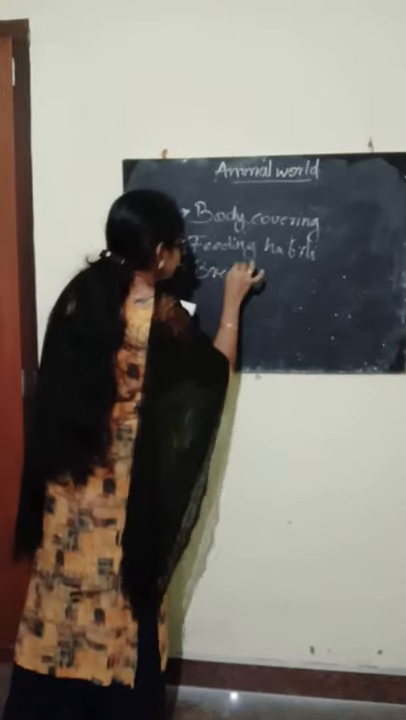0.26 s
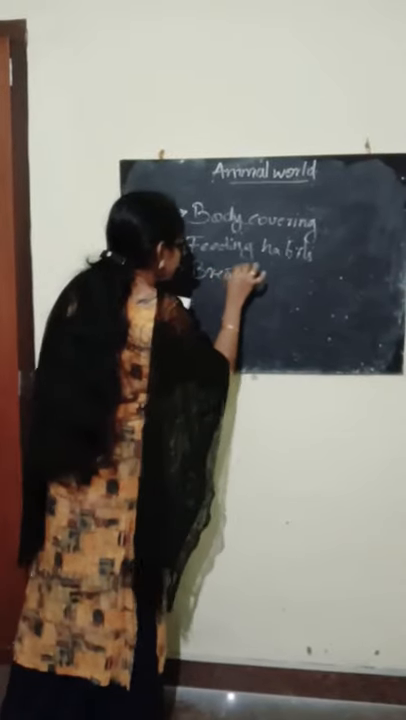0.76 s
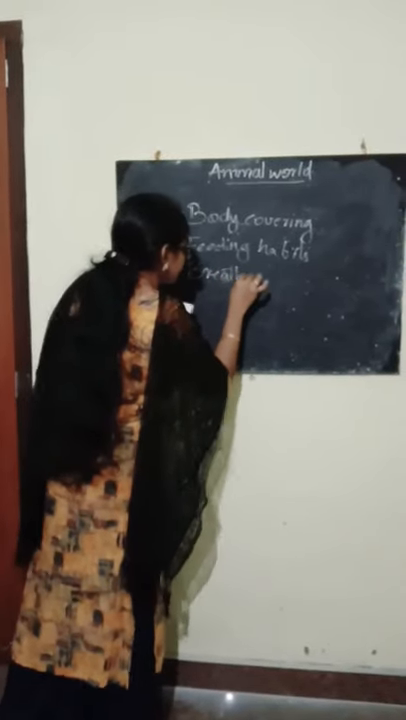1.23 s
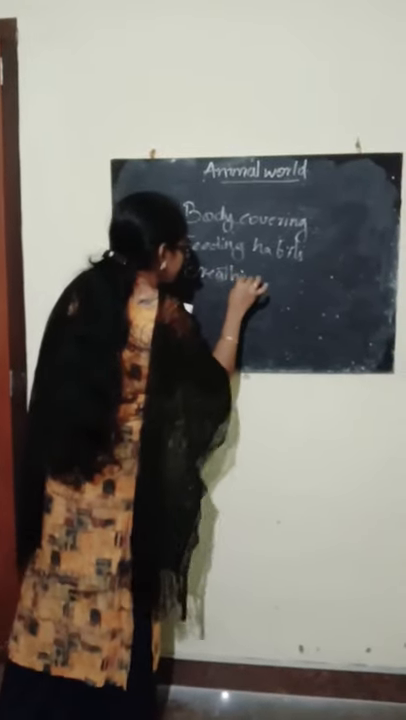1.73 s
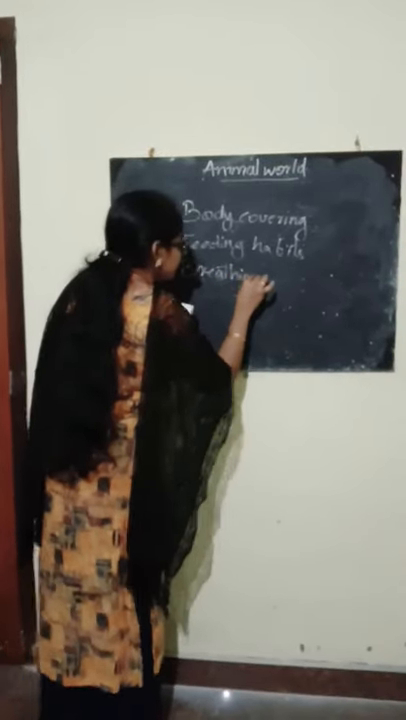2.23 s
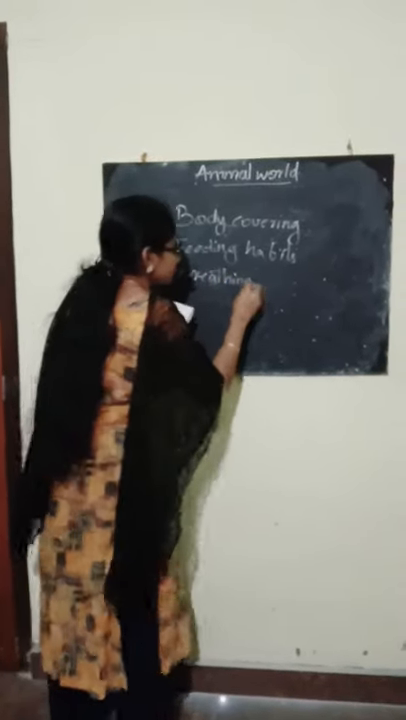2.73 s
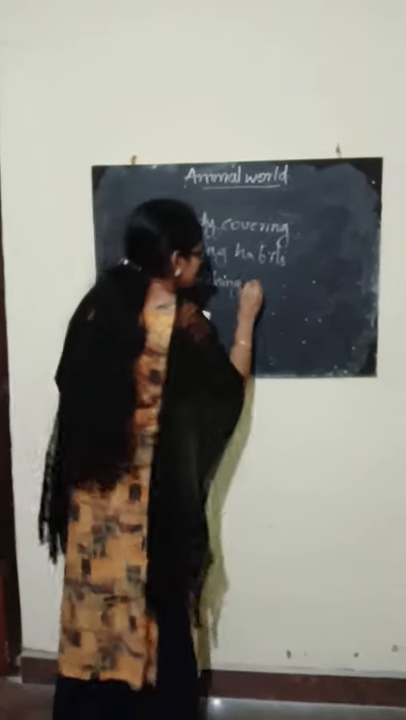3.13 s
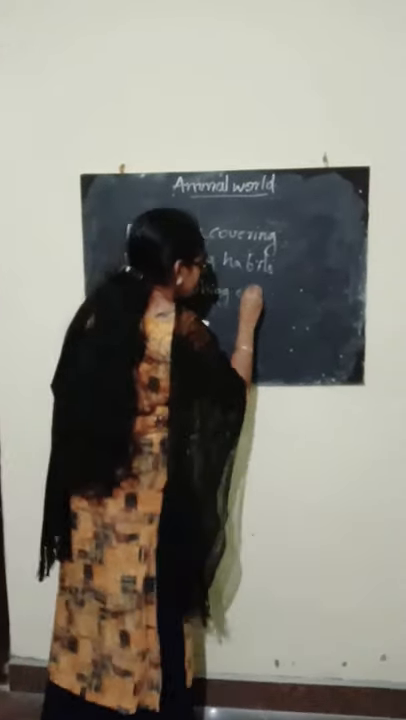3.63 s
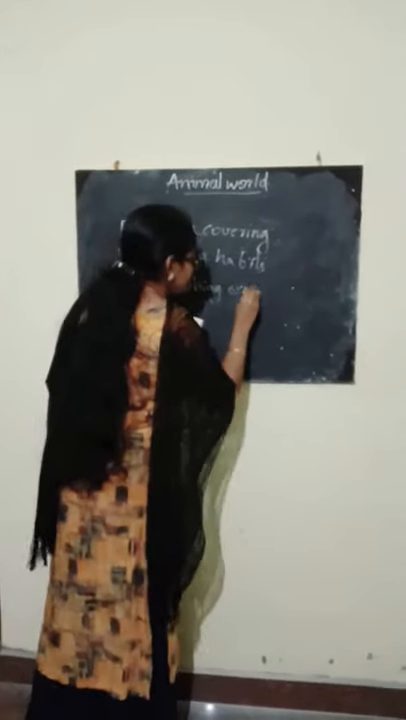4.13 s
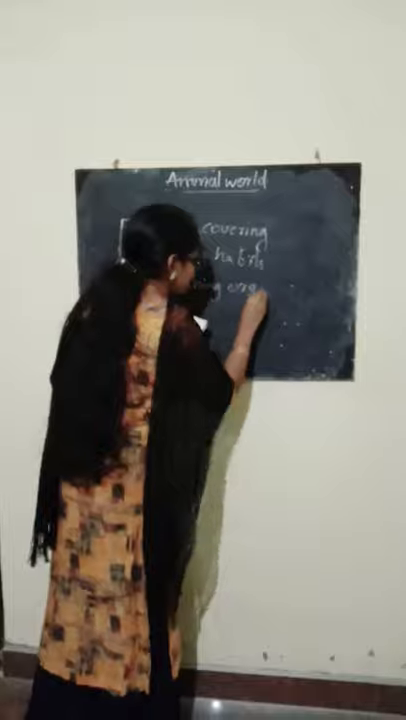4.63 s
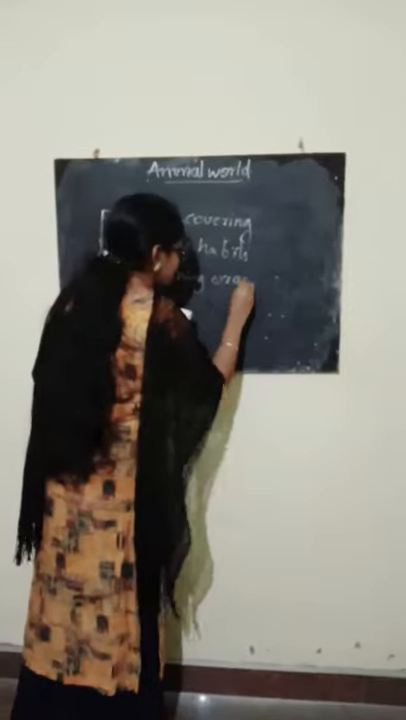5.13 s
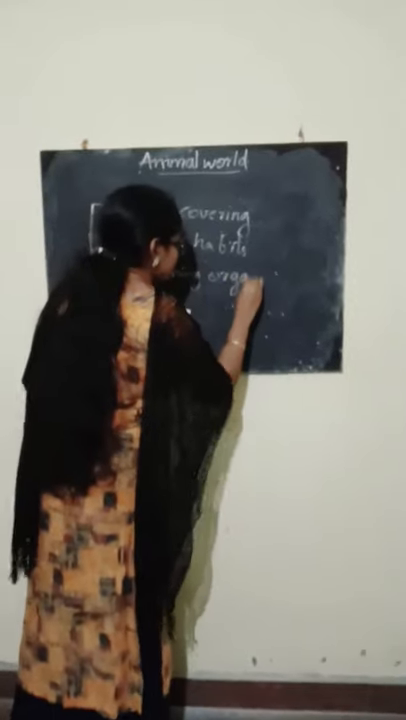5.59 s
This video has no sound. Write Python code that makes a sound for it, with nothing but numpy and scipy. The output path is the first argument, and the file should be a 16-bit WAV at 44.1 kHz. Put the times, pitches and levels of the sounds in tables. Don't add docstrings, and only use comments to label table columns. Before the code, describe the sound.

Chalk writes on a thin wall-mounted blackboard in a bare, echoing room, with quick scratchy strokes, sharp taps and short pauses.

```python
import sys
import numpy as np
from scipy import signal
from scipy.fft import rfft, irfft, next_fast_len
from scipy.io import wavfile
from scipy.ndimage import uniform_filter1d

SR = 44100
rng = np.random.default_rng(int(sys.argv[2]) if len(sys.argv) > 2 else 0)


def to_wav(sig):
    pcm = np.clip(np.atleast_2d(sig), -1, 1) * 32767
    pcm = np.round(pcm).astype(np.int16)
    wavfile.write(sys.argv[1], SR, pcm.T)


def ratio(d):
    e = np.asarray(d, float) / 20
    return 10 ** e


N = 258381

# mode_hz, level_db, t60_s
BOARD_MODES = [(245.5, 4.5, 0.89), (334, 3.5, 0.54), (396, -11.5, 0.1), (457, -4.5, 0.1), (520, -7.5, 0.17),
               (670, 2.5, 0.45), (710, -13.5, 0.54), (795, 1, 0.3)]
# mode_hz, level_db, t60_s
CHALK_MODES = [(1019, -3.5, 0.38), (1420, -6, 0.14), (1830, -16, 0.036), (1880, -36, 0.09),
               (2500, -9, 0.09), (2735, 17, 0.021)]
CONTROL_STEP = 64


def rms_one(x):
    return x / np.sqrt(np.mean(x ** 2) + 1e-20)


def at_hz(points, hz):
    known_hz, known_value = np.transpose(points)
    return np.interp(np.log(hz), np.log(known_hz), known_value)


def coloured(x, points):
    size = next_fast_len(x.shape[-1] + SR // 4) // 2 * 2
    hz = np.maximum(np.arange(size // 2 + 1) * SR / size, 1)
    cepstrum = irfft(at_hz(points, hz) * np.log(10) / 20, size)
    cepstrum[1:size // 2] *= 2
    cepstrum[size // 2 + 1:] = 0
    return irfft(rfft(x, size) * np.exp(rfft(cepstrum)), size)[..., :x.shape[-1]]


def band(x, low_hz, high_hz):
    sections = signal.butter(2, [low_hz, high_hz], "band", fs=SR, output="sos")
    return signal.sosfilt(sections, x + 1e-18)


def drift(rate_hz):
    r = np.exp(-2 * np.pi * rate_hz / SR)
    wander = signal.lfilter([1], [1, -2 * r, r * r], rng.standard_normal(N + SR))
    return rms_one(wander[SR:])


def ring(x, hz, t60_s):
    r, w = ratio(-60 / (t60_s * SR)), 2 * np.pi * hz / SR
    return signal.lfilter([0, np.sin(w)], [1, -2 * r * np.cos(w), r * r], x + 1e-18)


def resonate(x, hz, width_hz):
    r, w = np.exp(-np.pi * width_hz / SR), 2 * np.pi * hz / SR
    return signal.lfilter(np.array([1, 0, -1]) * (1 - r * r) / 2, [1, -2 * r * np.cos(w), r * r], x + 1e-18)


def taps():
    # start_s, peak_db, thud_db, crack_db, tick_db
    landings = [
        (0.317, -25.5, -18, -13.5, -17),
        (0.628, -34.5, -12.5, -13.5, -23),
        (1.285, -39.5, -14, -22.5, -40),
        (1.527, -33.5, -14, -17.5, -25.5),
        (1.708, -28.5, -17.5, -23, -40),
        (3.583, -28, -19.5, -22, -26),
        (4.024, -30.5, -17, -20.5, -28.5),
        (4.869, -45, -24.5, -33, -34),
    ]
    # part_hz, level_db
    blow = [
        (90, 23.5),
        (260, 21),
        (750, 15.5),
        (1250, -3.5),
        (2700, 10.5),
        (4800, 12.5),
        (7800, 16),
        (15000, 13.5),
    ]
    hz, db = np.transpose(blow)
    out = np.zeros(N + SR)
    responses = room(count=len(landings), tail_db=-11)
    for (start_s, peak_db, thud, crack, tick), spot in zip(landings, responses):
        knock, air = thud + 6, tick + 6.9
        shares = np.array([thud, thud, thud, 0, knock, crack, tick, air])
        heard = coloured(spot, np.transpose([hz, db + shares + peak_db]))
        modes = sum(ratio(mode_db + rng.normal(-1.2, 2.4)) * resonate(heard, mode_hz, 5.1 / t60_s)
                    for mode_hz, mode_db, t60_s in [*BOARD_MODES, *CHALK_MODES[:-1]])
        brief = heard * np.exp(-np.arange(len(spot)) / SR / 0.0098)
        stick = ratio(4.5) * resonate(brief, 2750, width_hz=260)
        at = round(start_s * SR)
        out[at:at + len(spot)] += heard + modes + stick
    return out[:N]


def strokes():
    hiss_db, grit_db = dusting()
    hum_db, centre_hz, scratch_db = pressing()
    grains = crumbling()
    dust = dust_hiss(grains, hiss_db) + grit(grains, hiss_db + grit_db)
    dust = dust + whistles(grains, hiss_db + 0.62 * grit_db)
    rub = scratching(grains, scratch_db) + board_hum(grains, hum_db, centre_hz)
    return dust + rub + squeaks(grains) + knuckles(hum_db)


def dusting():
    # middle_s, length_s, hiss_db, grit_db
    chalk_strokes = [(-0.002, 0.092, -62, -57), (0.146, 0.12, -63.5, -83), (0.45, 0.16, -71, -46),
                     (0.736, 0.11, -59, -51), (0.928, 0.12, -59, -78), (1.058, 0.092, -61.5, -59),
                     (1.158, 0.13, -63, -78), (1.4, 0.12, -62, -73), (1.743, 0.11, -62, -62),
                     (1.912, 0.12, -67, -76), (2.013, 0.086, -62, -75), (2.113, 0.11, -64.5, -60),
                     (2.242, 0.11, -66.5, -56), (2.317, 0.16, -60.5, -60), (2.479, 0.15, -57.5, -57),
                     (2.614, 0.17, -56, -48.5), (2.756, 0.052, -68, -84),
                     (3.19, 0.096, -66, -65), (3.27, 0.15, -62.5, -59.5), (3.36, 0.1, -60.5, -56),
                     (3.462, 0.12, -63, -61), (3.74, .11, -64, -62), (3.89, 0.11, -63.5, -56.5),
                     (4.181, 0.15, -64.5, -65), (4.281, 0.13, -69.5, -71), (4.35, 0.038, -68, -61),
                     (4.5, 0.16, -58, -63), (4.658, 0.14, -56.5, -54.5), (4.81, 0.13, -71, -68),
                     (5.12, 0.25, -69, -73), (5.268, 0.19, -66.5, -62), (5.4, 0.084, -60.5, -58),
                     (5.63, 0.12, -65.5, -65), (5.77, 0.097, -59.5, -61)]
    middles, lengths, hiss, gritty = np.transpose(chalk_strokes)
    hiss_db = level_db(swells(middles, lengths, hiss - 3), rest_db=-91.5)
    return hiss_db, level_db(swells(middles, lengths, gritty - 4), rest_db=-80.5) - hiss_db


def pressing():
    # middle_s, length_s, hum_db, centre_hz,
    # scratch_db
    hand_presses = [(0.03, 0.098, -61.5, 660, -56), (0.176, 0.12, -68.5, 514, -62.5),
                    (0.454, 0.093, -52.5, 374, -55), (0.907, 0.071, -63.5, 374, -60.5),
                    (0.944, 0.056, -58.5, 490, -54.5), (1.067, 0.16, -55, 400, -60.5),
                    (1.175, 0.11, -70.5, 500, -58.5), (1.379, 0.063, -55.5, 452, -61),
                    (1.96, 0.1, -73, 464, -63), (2.149, 0.15, -64, 526, -61),
                    (2.352, 0.13, -68.5, 442, -60.5), (2.55, 0.19, -57.5, 452, -48),
                    (2.624, 0.066, -60, 440, -68),
                    (3.06, 0.064, -62.5, 640, -71), (3.17, 0.066, -62, 396, -65),
                     (3.371, 0.095, -51, 436, -45.5), (3.89, 0.14, -64, 375, -59),
                     (4.3, 0.23, -68.5, 348, -61), (4.482, 0.12, -53.5, 366, -77),
                     (4.63, 0.16, -57.5, 464, -52.5), (4.89, 0.043, -67, 587, -55),
                     (5.12, 0.038, -67, 340, -58), (5.268, 0.07, -78, 629, -52),
                     (5.39, 0.076, -60.5, 313, -55), (5.77, 0.17, -65, 500, -57)]
    middles, lengths, hum, centres, scratch = np.transpose(hand_presses)
    rest_hum_db, rest_centre_hz = -80, 400
    powers, rest = swells(middles, lengths, hum - 3), ratio(2 * rest_hum_db)
    centre_hz = (centres @ powers + rest_centre_hz * rest) / (powers.sum(axis=0) + rest)
    scratch_db = level_db(swells(middles, lengths, scratch - 4), rest_db=-68.5)
    return level_db(powers, rest_hum_db), every_sample(centre_hz), scratch_db


def swells(middles, lengths, levels_db):
    rise_db, fall_db = 12, 14
    time_s = np.arange(0, N + CONTROL_STEP, CONTROL_STEP) / SR
    away = 2 * (time_s - middles[:, None]) / lengths[:, None]
    return ratio(2 * (levels_db[:, None] - np.where(away < 0, rise_db, fall_db) * away ** 2))


def every_sample(coarse):
    return np.interp(np.arange(N) / CONTROL_STEP, np.arange(len(coarse)), coarse)


def level_db(powers, rest_db):
    return every_sample(10 * np.log10(powers.sum(axis=0) + ratio(2 * rest_db)))


def crumbling():
    sizes = ratio(2.1 * np.minimum(rng.exponential(1, N), 5)) * rng.choice([-1, 1], N)
    return sizes * (rng.random(N) < 12000 / SR)


def dust_hiss(grains, hiss_db):
    hiss = rms_one(band(grains, 6400, 17000)) * ratio(hiss_db + 6 + 2.9 * drift(12.4))
    top = band(band(grains, 14000, 17000), 14000, 17000)
    return hiss + rms_one(top) * ratio(hiss_db + 6 + 1.5 * drift(12))


def grit(grains, grit_db):
    edges = 1500 * 2 ** np.arange(0, 2.5, .25)
    patches = sum(band(grains, lo, hi) * ratio(4 * drift(14) + 4 * np.log2(min(lo / 2800, 1)))
                  for lo, hi in zip(edges, edges[1:]))
    return rms_one(patches) * ratio(grit_db - 8.5)


def whistles(grains, whistle_db):
    # whistle_hz, width_hz
    flecks = [(3830, 26), (4350, 75), (5100, 180), (5450, 30), (5890, 77), (6300, 29), (7100, 110),
              (7630, 400), (8010, 40)]
    tones = sum(ratio(4 * drift(11)) * rms_one(resonate(grains, hz, 1.6 * width_hz))
                for hz, width_hz in flecks)
    return rms_one(tones) * ratio(whistle_db - 8.0)


def scratching(grains, scratch_db):
    stick = rms_one(sum(ratio(db + 3.3 * drift(12)) * ring(grains, hz, t60_s)
                        for hz, db, t60_s in CHALK_MODES))
    rough, edges = rng.permutation(grains), 730 * 2 ** np.arange(0, 2.2, .25)
    rasp = sum(band(rough, lo, hi) * ratio(2.6 * drift(15.8)) for lo, hi in zip(edges, edges[1:]))
    return (rms_one(rasp) + 0.51 * stick) * ratio(scratch_db - 10.5)


def board_hum(grains, hum_db, centre_hz):
    hum = 0
    for hz, db, t60_s in BOARD_MODES:
        coupling_db = db - 26.2 * np.log2(hz / centre_hz) ** 2 + 2.5 * drift(5.7)
        hum = hum + ratio(coupling_db) * rms_one(ring(grains, hz, 0.96 * t60_s))
    rumble = rms_one(band(rng.permutation(grains), 290, 530))
    return (hum + 0.9 * rumble) * ratio(hum_db - 2.5)


def squeaks(grains):
    # middle_s, pitch_hz, width_hz, level_db, length_s
    slips = [
        (0.898, 1240, 120, -72, 0.051),
        (3.89, 334, 25, -57, .1),
        (3.887, 670, 40.3, -63.5, 0.066),
        (4.484, 334, 25, -56, 0.092),
        (4.557, 670, 30, -62, 0.052),
        (4.832, 4370, 120, -65.5, 0.037),
        (5.366, 340, 50, -60.5, 0.045),
    ]
    time_s, out = np.arange(N) / SR, np.zeros(N)
    for middle_s, hz, width_hz, db, length_s in slips:
        envelope = np.exp(-4 * ((time_s - middle_s) / length_s) ** 2)
        tone = resonate(resonate(grains, hz, width_hz), hz, width_hz)
        out += ratio(db) * envelope * rms_one(tone)
    return out


def knuckles(hum_db):
    thump = rms_one(band(rng.standard_normal(N), 53, 202))
    return thump * ratio(0.72 * hum_db - 34 + 1.9 * drift(3.1))


def room(count, tail_db):
    # band_hz, t60_s
    decay = [(120, 0.38), (400, 0.46), (1200, 0.45), (3000, 0.42), (8000, 0.43), (15000, 0.39)]
    # delay_s, level_db
    reflections = [(.0038, -11.5), (0.0097, -2), (0.0156, -18)]
    t = np.arange(SR // 2) / SR
    edges = 60 * 2 ** np.arange(0, 8.4, .5)
    white = rng.standard_normal((count, 2, len(t)))
    tail = 0
    for k, (lo, hi) in enumerate(zip(edges, edges[1:])):
        t60_s = at_hz(decay, np.sqrt(lo * hi))
        tail = tail + band(white[:, k % 2], lo, hi) * ratio(-60 * t / t60_s)
    build_up, fade_out = np.clip(t / 0.0053, 0, 1), np.clip((t[-1] - t) / 0.08, 0, 1)
    response = ratio(tail_db) * tail * build_up * fade_out
    response *= 1 + 0.16 * np.exp(-t / 0.054)
    response[:, 0] += 1
    for delay_s, db in reflections:
        response[:, round(delay_s * SR)] += ratio(db)
    return response


def room_hush():
    # band_hz, density_db (dB per Hz)
    hush_shape = [(30, 12.5), (100, 12), (300, -3), (1000, -16.5), (3000, -13), (8000, -21), (11000, -10),
                  (15000, -8)]
    return ratio(-59 + drift(4.6)) * rms_one(coloured(rng.standard_normal(N), hush_shape))


def scene():
    # band_hz, level_db
    side_shape = [(30, -8), (90, -12), (180, -14.5), (350, -22.5), (1400, -33.5), (5500, -26.5),
                  (9000, -43), (14000, -16.5)]
    rubbing = strokes()
    reverberant = signal.fftconvolve(rubbing, room(count=1, tail_db=-7.5)[0])[:N]
    mid = ratio(7.0) * taps() + rubbing + ratio(-27.5) * reverberant + room_hush()
    loudness = np.sqrt(uniform_filter1d(mid ** 2, size=1000) + 1e-20)
    side = coloured(rng.standard_normal(N) * loudness, side_shape) * ratio(5)
    return np.array([mid + side, mid - side])


def top_cut(x):
    return signal.sosfilt(signal.butter(12, 16690, fs=SR, output="sos"), x)


def record(dry):
    # band_hz, level_db
    mic_shape = [(25, -44), (60, -16), (200, -3), (900, 6.5), (2700, 3.5), (4000, 0), (6000, 1.5),
                 (6600, -6.5), (7400, 8.5), (8100, 2), (9200, -13.5), (11500, -25), (13800, -19),
                 (15100, -14.5)]
    case = ratio(15.5) * resonate(dry, 1253.5, width_hz=62.8)
    heard = coloured(dry + case, mic_shape)
    size = next_fast_len(N + SR)
    hz = np.maximum(np.arange(size // 2 + 1) * SR / size, 1)
    heard = irfft(rfft(heard, size) * (hz < 15620), size)[:, :N]
    return top_cut(heard)


dry = scene()
out = record(dry)
to_wav(out)
```